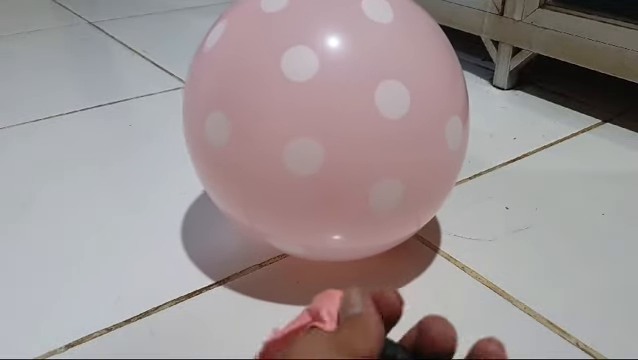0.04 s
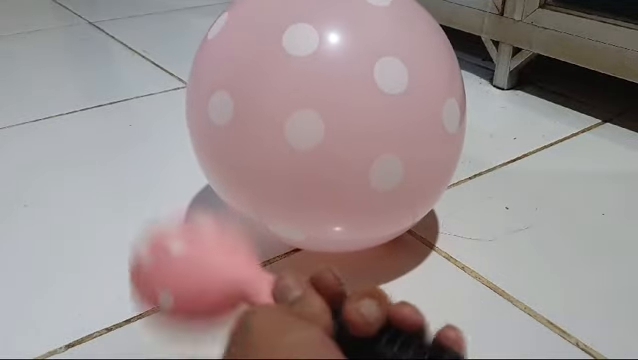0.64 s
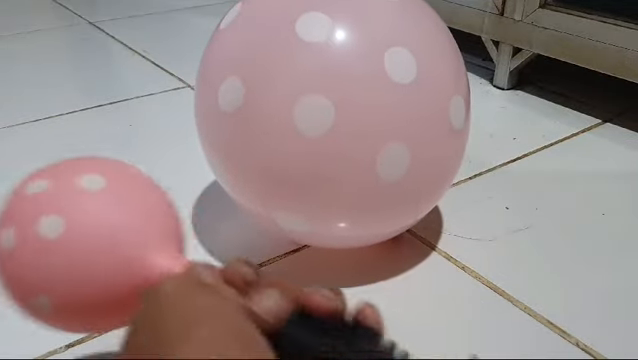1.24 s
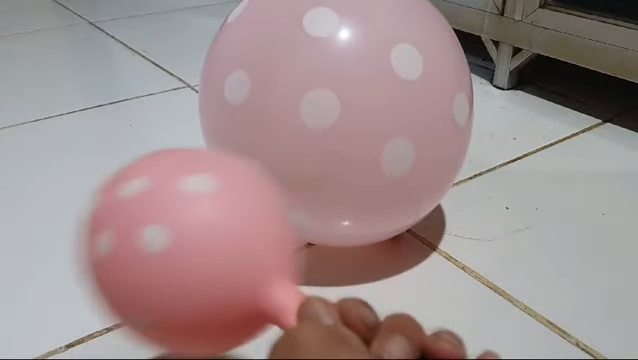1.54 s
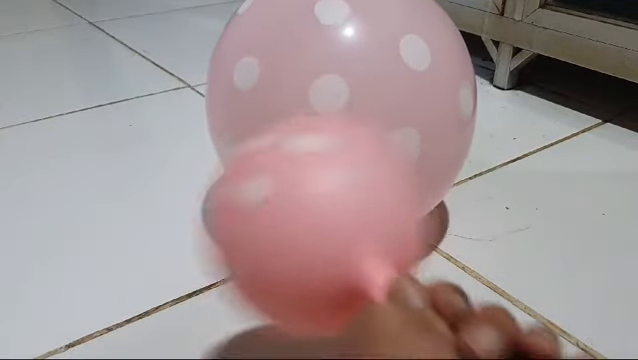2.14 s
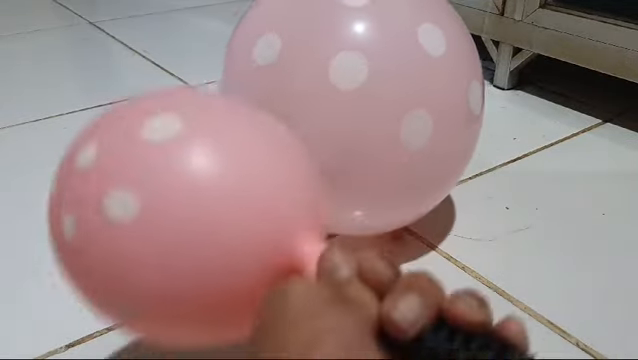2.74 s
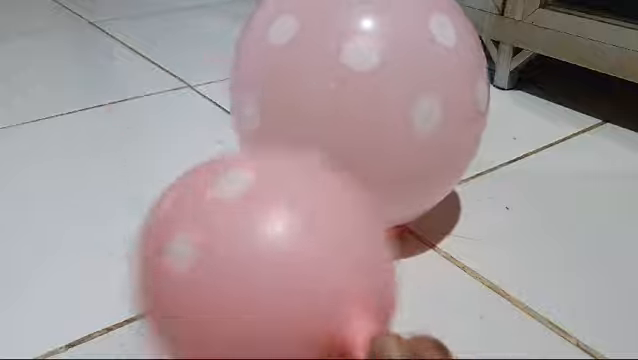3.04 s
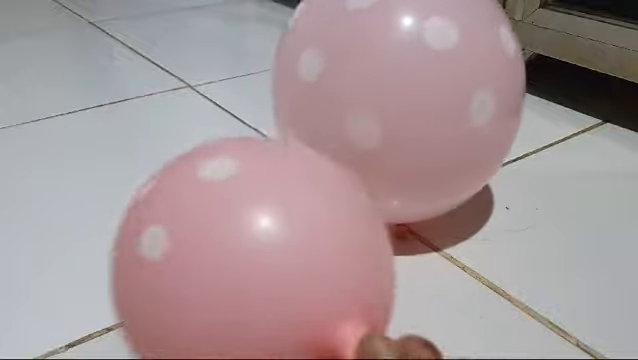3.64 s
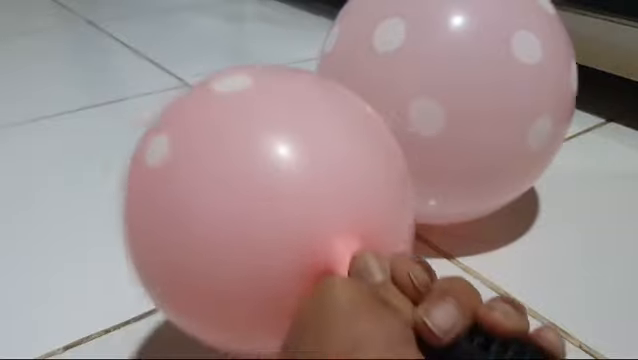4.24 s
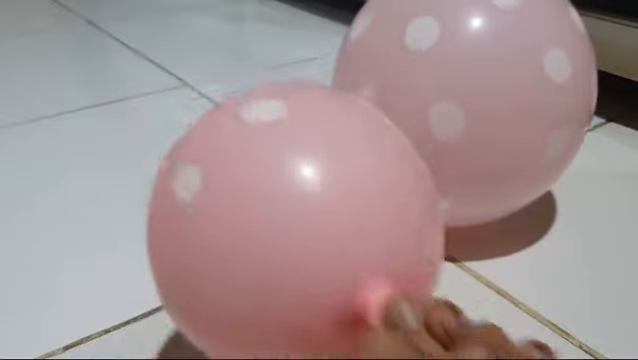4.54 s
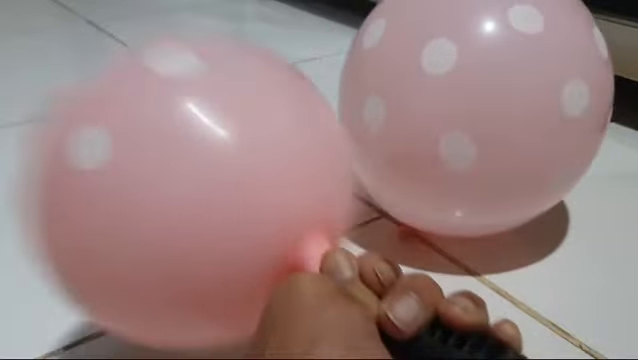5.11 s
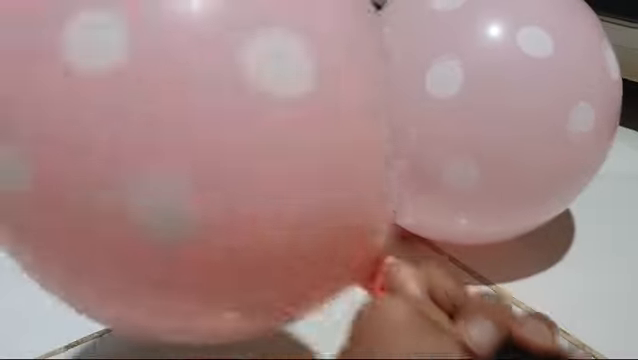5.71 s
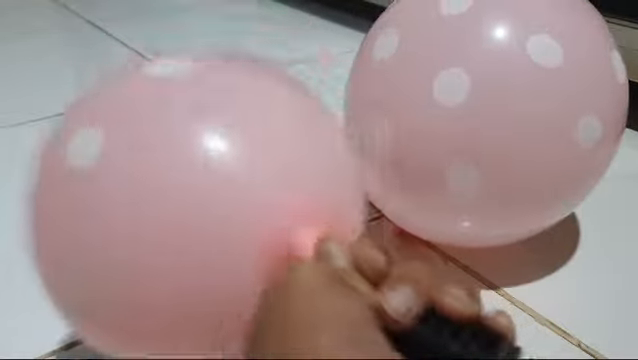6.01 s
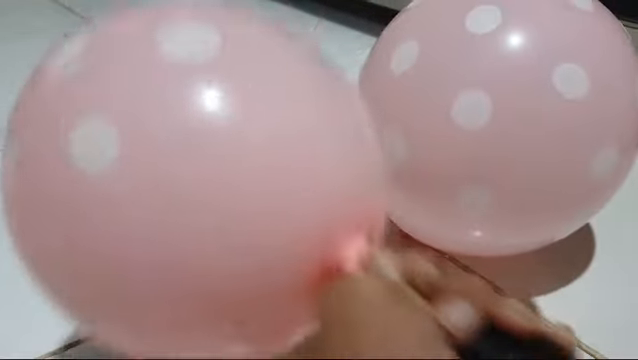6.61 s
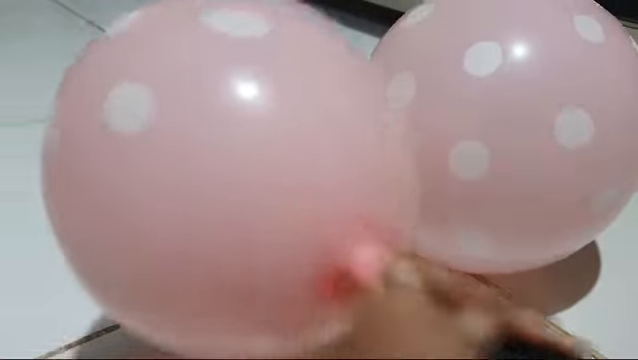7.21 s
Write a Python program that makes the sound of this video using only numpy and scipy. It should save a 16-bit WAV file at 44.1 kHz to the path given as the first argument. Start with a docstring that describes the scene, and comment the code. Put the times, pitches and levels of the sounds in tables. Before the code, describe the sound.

A two-way hand pump inflates a rubber balloon close to the microphone, slightly to the right, in a tiled room with a faint electrical hum. A tiny rubber chirp opens, followed by soft, slow puffs of air. From about 1 second the pumping turns brisk and regular, a little over two pushes a second, each a rasping hiss followed by a softer hiss on the pull. Soft thuds mark the start of each push, and sharp plastic knocks often mark its end, with dry ticks, small rattles and faint hand rubbing between. The strokes are strong from about 1.5 seconds, and between 2.5 and 4.5 seconds the hiss becomes higher and thinner as the balloon fills. The rubber neck flutters in three very short buzzes at about 6.1, 6.9 and 7.2 seconds, with a tiny squeak near 6.7. Pumping continues to the end, around 7.4 seconds.

```python
"""A tiled room with a mains hum, where a two-way hand pump fills a balloon close by.
Every push and pull drives a rush of air through the valves and the rubber neck, whose resonance climbs
as the balloon grows, while the modes of the air inside sink. The piston thuds and knocks at its stops,
flaps and rod tick, hands rub on the barrel and the rubber chirps against the nozzle.
Late on, the neck flutters into three short buzzes."""
import sys
import numpy as np
from scipy import signal
from scipy.fft import rfft, irfft
from scipy.io import wavfile
from scipy.ndimage import uniform_filter1d

SR = 44100
rng = np.random.default_rng(int(sys.argv[2]) if len(sys.argv) > 2 else 0)


def pcm_store(signal):
    """Save signal as 16-bit PCM."""
    levels = np.round(np.clip(np.atleast_2d(signal), -1, 1) * 32767)
    wavfile.write(sys.argv[1], SR, levels.astype(np.int16).T)


N = 320166

# Table levels are relative: each layer sets its own gain on top.
# The room's steady wash. Each row: frequency in Hz, noise density in dB.
WASH_SPECTRUM = [(20, -27), (45, -3), (80, -20), (160, 7), (300, 10), (700, 4.5), (1400, 2.5), (3000, -24),
                 (8000, -20), (16000, -58)]
# Mains hum. Each row: frequency in Hz, level in dB.
HUM_PARTIALS = [(100.05, -45.8), (200.1, -69)]
# Stereo width of diffuse sound. Each row: frequency in Hz, left-right coherence from 0 to 1.
COHERENCE = [(30, 0.97), (130, 1), (300, 0.85), (640, 0.92), (1400, 0), (4000, 0.2), (16000, 0.0)]
# The room's tail. Each row: frequency in Hz, seconds to fall 60 dB.
ROOM_DECAY = [(100, 0.074), (500, 0.33), (2000, 0.34), (8000, 0.25), (16000, 0.086)]
# Hands moving on the barrel. Each row: frequency in Hz, noise density in dB.
HAND_SPECTRUM = [(15, -1), (32, -36), (70, 7.5), (140, -5.5), (300, -16.5), (700, -35), (2000, -30.5)]

# Rubber on the nozzle. Each row: start in seconds, level in dB, pitch in Hz, length in seconds.
CHIRPS = [(0.023, -47.5, 3420, 0.034), (0.068, -52, 6460, 0.069), (6.7192, -20, 3470, 0.0042),
          (6.7226, -22, 3430, 0.00086)]
# Valve flaps and the loose rod. Each row: time in seconds, level in dB, base pitch in Hz.
TICKS = [(0.3188, -35.5, 690), (1.0812, -33, 1040), (1.3208, -35.5, 760), (1.5772, -32.5, 1000),
         (2.0405, -24.5, 1060), (2.231, -24.5, 910), (2.4928, -32, 920), (2.7112, -32, 850),
         (3.0333, -25, 880), (3.605, -24.5, 1000), (3.8124, -29.5, 850), (4.1179, -31, 710),
         (4.3151, -28, 810), (4.5629, -36.5, 850), (4.7388, -26, 790), (4.9866, -31, 910),
         (5.5646, -28, 756), (5.8193, -32, 1210), (5.9871, -33, 710), (6.3676, -31.5, 740),
         (6.639, -30, 770), (6.7133, -33, 710)]
# The body of a tick. Each row: multiple of the base pitch, level in dB, seconds to fall 60 dB.
TICK_MODES = [(0.5, -37, 0.018), (1.02, 23.5, 0.01), (1.55, 23.5, 0.0098), (3.4, -30, 0.0035)]
# A flap slammed by the air. Each row: frequency in Hz, level in dB, seconds to fall 60 dB.
SNAP_MODES = [(2520, 6, 0.017), (2790, 0, 0.023), (4800, 1, 0.0058)]
# The piston hits the barrel's end. Each row: time in seconds, then thump, clack and crack levels in dB.
KNOCKS = [(1.1336, -50.5, -37, -23), (1.5494, -41.5, -21, -12), (2.0125, -40, -22.5, -9.5),
          (2.4434, -40, -18.5, -6.5), (4.0897, -41, -23, -10), (4.5332, -38.5, -21, -8),
          (4.963, -40.5, -24, -12), (5.4332, -50, -22.5, -29), (5.7917, -39, -26, -4),
          (6.2045, -40.5, -23.5, -11.5), (6.594, -40.5, -18.5, -3), (7.0184, -47.5, -32.5, -29)]
# The balloon's thump. Each row: frequency in Hz, level in dB, seconds to fall 60 dB.
THUMP_MODES = [(31.4, -40, 0.56), (65, -27.5, 0.55), (122.7, -6.5, 0.065), (255, -15, 0.068)]
# The barrel's clack. Each row: base frequency in Hz, level in dB, seconds to fall 60 dB.
CLACK_MODES = [(378, -4, 0.013), (503, 11.5, 0.029), (1070, 7.5, 0.0086), (1650, 9.5, 0.014)]
# The crack of hard plastic. Each row: frequency in Hz, noise density in dB.
CRACK_SPECTRUM = [(500, -17), (1500, 5), (4000, -9.5), (7000, -11.5), (11000, -9), (16000, -18)]
# The piston turns round to push. Each row: time in seconds, pop level in dB.
THUDS = [(0.9235, -28), (1.3765, -23.5), (1.855, -27), (2.299, -24.5), (2.8053, -39), (3.3548, -21),
         (3.892, -35.5), (4.3765, -21.5), (4.802, -21.5), (5.2249, -22.5), (5.6438, -21), (6.057, -21.5),
         (6.4524, -21), (6.8434, -23), (7.181, -21.5)]
# Pump and balloon swaying. Each row: frequency in Hz, level in dB, seconds to fall 60 dB.
SWAY_MODES = [(74.8, 8, 0.13), (135, -3.5, 0.14), (207, -8.5, 0.058), (260, -11, 0.05)]
# The neck flutters. Each row: start in seconds, length in seconds, level in dB, opening pitch in Hz.
BUZZES = [(6.112, 0.066, -35, 387.5), (6.897, 0.045, -39, 316), (7.233, 0.07, -32.5, 420)]
# The tone curve over the buzz's harmonics. Each row: frequency in Hz, level in dB.
BUZZ_SPECTRUM = [(300, 3), (420, 5), (770, 4), (1150, -5), (1600, 1), (2100, -17), (2800, 1), (5000, -21)]

# Push strokes. Each row: start in seconds, length in seconds, level in dB, neck resonance boost in dB.
PUSHES = [(0.409, 0.36, -32.5, 9), (0.936, 0.2, -29.5, 15.5), (1.384, 0.21, -23.0, 18),
          (1.863, 0.19, -23.5, 13.5), (2.307, 0.19, -22.0, 9.5), (2.818, 0.222, -24.5, 3.5),
          (3.348, 0.31, -27, 1), (3.885, 0.29, -26.5, 5), (4.371, 0.23, -23.0, 5), (4.798, 0.22, -23, 0),
          (5.224, 0.22, -20.5, -2), (5.639, 0.22, -20.0, -3), (6.054, 0.21, -23.0, 5),
          (6.431, 0.24, -30, -0.5), (6.84, 0.17, -26, 5.5), (7.171, 0.24, -24, 5)]
# Pull strokes. Each row: start in seconds, length in seconds, level in dB.
PULLS = [(0.12, 0.33, -42.5), (0.64, 0.3, -40.5), (1.144, 0.23, -33), (1.619, 0.23, -32.5),
         (2.072, 0.21, -29.5), (2.501, 0.31, -28.5), (3.038, 0.31, -29.5), (3.604, 0.3, -30),
         (4.125, 0.28, -30.0), (4.565, 0.25, -28.0), (4.989, 0.25, -29), (5.416, 0.229, -30),
         (5.833, 0.22, -30.5), (6.237, 0.22, -30.5), (6.642, 0.2, -32), (6.979, 0.21, -33.0)]
# The push valve's hiss. Each row: frequency in Hz, noise density in dB, left minus right in dB.
PUSH_VALVE = [(305, -22.5, 5), (775, -6, -3), (870, -9.5, 0.5), (1630, -4, 1), (2440, -5.5, 2.5),
              (2820, -1, -4.5), (3920, -2, -6.5), (5800, 0, -1), (8580, -3, -4.5), (9070, -9.5, 10.5),
              (11550, -6.5, -11.5), (14900, -10.5, -2.5), (16000, -19, -1)]
# The pull valve's hiss. Each row: frequency in Hz, noise density in dB, left minus right in dB.
PULL_VALVE = [(300, -33, -11), (690, -6.5, -1), (890, -15.5, 5), (1580, -5, 0), (2150, -3.5, 1.5),
              (2970, 2, -2.5), (3800, -1.5, -8), (5840, -4, -1.5), (8300, -6.5, -2), (9500, -11.5, -2),
              (12200, -9, -11), (14500, -13, -5.5), (16000, -19, -1.1)]
# The hiss thins as the rubber stretches.
# Each row: time in seconds, neck resonance in Hz, low shelf (body) in dB, high shelf (fizz) in dB.
STRETCH = [(0.58, 3700, 5.5, 0.5), (0.8, 2680, 1.5, 5.5), (1.04, 3900, 6, 1), (1.5, 4000, 0, 4),
           (1.95, 4060, -7.5, -2), (2.5, 4280, -3, -1), (3.7, 6060, -6, -3), (4.5, 6450, -7.5, 1),
           (5.4, 5640, -2.5, 0.5), (6.5, 5860, -4, 2.5), (7.2, 5800, -4, 3)]
# The air inside the balloon at size 1. Each row: centre in Hz, width in Hz, boost or cut in dB.
BALLOON_MODES = [(1400, 470, 6.5), (2570, 170, 8.5), (4060, 280, 4.5), (4380, 220, -5.5), (5600, 46, 11),
                 (6800, 120, 8), (7780, 260, -1), (8530, 220, 1.5), (10030, 240, -1), (12000, 530, 2)]
# Resonances of barrel and nozzle. Each row: centre in Hz, width in Hz, boost in dB.
BARREL_MODES = [(1350, 220, 6), (3000, 180, 2.5), (3850, 160, 2.5), (4200, 220, 3), (6450, 200, 1.5),
                (8250, 350, 2)]

EDGE_HZ = 15900  # top of the audible band of the scene
FRAME, HOP = 512, 128  # samples; the hiss is shaped frame by frame
TIME = np.arange(N) / SR
BINS = np.fft.rfftfreq(FRAME, 1 / SR)
FRAME_TIME = np.arange(N // HOP + 5) * HOP / SR
RING_TIME = np.arange(SR // 4) / SR

# A stroke is one arch of air flow: the share of its length at which it crests, and how pointed it is.
PUSH_CREST, PULL_CREST, ARCH_POWER = 0.38, 0.43, 2.48
BLEED_DB, BLEED_S = -8, 0.026  # pressure left in the barrel bleeds away after each stroke
SLACK_DB, LEAK_DB, LEAK_BUILD_S = -56.5, -49.5, 0.26  # the nozzle leaks more once the neck has filled
SPURT_DB, SPURT_S, SPURT_LEAD_S = -42, 0.0054, 0.005  # a spurt slips past the seal as it flips over
# A pull sounds through the other valve: a steadier, slightly higher neck resonance and more body.
PULL_NECK_DB, PULL_NECK_RATIO, PULL_BODY_DB = 8, 1.037, 4.0
# The rod ticks faintly once in each pull, within this share of the stroke around its middle.
FAINT_SHARE, FAINT_DB, FAINT_SPREAD_DB, FAINT_HZ = 0.6, -37, 5, 750


def amp(db):
    """Decibels to gain."""
    return 10 ** (np.asarray(db) / 20)


def unit(x):
    """Scales to rms 1."""
    return x / np.sqrt(np.mean(x ** 2) + 1e-20)


def curve(table, hz, column=1):
    """One column of a table, interpolated on a log-frequency axis."""
    columns = np.transpose(table)
    return np.interp(np.log(hz + 1), np.log(columns[0] + 1), columns[column])


def add(mix, s, sound):
    """Drops a stereo sound into the mix at s seconds."""
    part = mix[:, max(round(s * SR), 0):][:, :sound.shape[1]]
    part += sound[:, :part.shape[1]]


def wander(rate_hz, size=N):
    """A smooth random wobble of about rms 1, rolled off above rate_hz."""
    hz = np.fft.rfftfreq(N, 1 / SR)
    return unit(irfft(rfft(rng.standard_normal(N)) / (1 + (hz / rate_hz) ** 4), N))[:size]


def diffuse(a, b, hz):
    """Blends two independent spectra into a stereo pair, narrow in the bass and wide on top."""
    same = np.clip(curve(COHERENCE, hz), -1, 1)
    return np.array([a, same * a + np.sqrt(1 - same ** 2) * b])


def noise(spectrum):
    """A steady bed of diffuse, coloured stereo noise at rms 1."""
    hz = np.fft.rfftfreq(N, 1 / SR)
    white = diffuse(*rfft(rng.standard_normal((2, N))), hz)
    return unit(irfft(white * amp(curve(spectrum, hz)), N))


def ring(modes, contact_s, pitch=1):
    """Damped modes, struck once, at peak 1; a longer contact gives a duller hit."""
    wave = sum(amp(db - 60 * RING_TIME / t60) * np.sin(2 * np.pi * hz * pitch * RING_TIME)
               for hz, db, t60 in modes)
    force = RING_TIME * np.exp(-RING_TIME / contact_s)
    wave = signal.fftconvolve(wave, force)[:len(wave)]
    return wave / abs(wave).max()


def peaks(modes, hz):
    """Resonances as bell curves, in dB at the frequencies hz."""
    return sum(db / (1 + (2 * (hz - centre) / width) ** 2) for centre, width, db in modes)


def pan_right(sound, lag_s=0.00026, shade_db=8.0, shade_hz=450):
    """Places a sound on the pump's side: the left hears it later and, above the bass, weaker."""
    hz = np.fft.rfftfreq(len(sound), 1 / SR)
    side = amp(shade_db / 2 * hz / (hz + shade_hz))
    delay = np.exp(-2j * np.pi * hz * lag_s)
    return irfft(rfft(sound) * np.array([delay / side, side]), len(sound))


def room_tone(wash_db=-56):
    """Mains hum over a soft, steady wash."""
    hum = sum(np.sqrt(2) * amp(db) * np.sin(2 * np.pi * (hz * TIME + rng.random()))
              for hz, db in HUM_PARTIALS)
    return amp(wash_db) * noise(WASH_SPECTRUM) + pan_right(hum, lag_s=0.0001)


def reverb(send, build_s=0.0017):
    """The tiled room's diffuse tail, each band dying at its own speed."""
    hz, t, white = signal.stft(rng.standard_normal((2, SR // 2)), SR, nperseg=256)
    decay = amp(-60 * t / curve(ROOM_DECAY, hz)[:, None])
    tail = signal.istft(white * decay * (1 - np.exp(-t / build_s)), SR, nperseg=256)[1]
    return signal.fftconvolve(send, tail / np.linalg.norm(tail[0]), axes=1)[:, :N]


def hand_rub(level_db=-52, lump_db=1.0, rest_db=-7, jolt_db=6.0, jolt_s=0.038):
    """Low, lumpy rubbing of hands: it sets in with the hard pumping and swells after each piston stop."""
    first_thud = THUDS[0][0]
    effort_db = np.interp(TIME, [first_thud / 2, first_thud], [rest_db, 0])
    jolts = sum((FRAME_TIME > s) * np.exp(-abs(FRAME_TIME - s) / jolt_s) for s, *_ in THUDS + KNOCKS)
    effort_db += jolt_db * np.interp(TIME, FRAME_TIME, jolts)
    sides = amp([wander(4.2), wander(2.7)])  # left and right each drift by about 1 dB
    return noise(HAND_SPECTRUM) * sides * amp(level_db + effort_db + lump_db * wander(14))


def rubber_chirps(waver=0.098):
    """Brief, wavering whistles as the rubber sticks and slips on the nozzle."""
    out = np.zeros((2, N))
    for s, db, hz, length in CHIRPS:
        count = round(length * SR)
        cycles = np.cumsum(hz * (1 + waver * wander(600, count))) / SR
        whistle = np.sin(2 * np.pi * cycles) * np.hanning(count)
        add(out, s, pan_right(amp(db) * whistle, shade_db=15.5))
    return out


def piston_rattles(level_db=-37, spread_s=0.018, pitch_hz=300, count=3):
    """The loose piston shifts in the barrel before each thud and settles after each knock."""
    out = np.zeros((2, N))
    for s, direction in [(row[0], -1) for row in THUDS] + [(row[0], 1) for row in KNOCKS]:
        for when, tone, softness in rng.random((count, 3)):
            bump = ring(TICK_MODES, contact_s=0.00016, pitch=pitch_hz * (.5 + tone))
            offset_s = direction * spread_s * (0.195 + when)
            add(out, s + offset_s, amp(level_db - 6.2 * softness) * pan_right(bump))
    return out


def flap_and_rod_ticks(gain_db=7.0, lead_s=0.00082, snap_db=0.5, full_flow_db=-35):
    """Dry ticks of flaps and rod, with a bright snap on top while air is flowing."""
    out = np.zeros((2, N))
    snap = ring(SNAP_MODES, contact_s=0.00002)
    hits = list(TICKS)
    for start, length, _ in PULLS:
        when, size, tone = rng.random(3) - .5
        s = start + length * (.5 + FAINT_SHARE * when)
        hits.append((s, FAINT_DB + FAINT_SPREAD_DB * size, FAINT_HZ * 2 ** (tone / 2)))
    for (s, db, hz), stream_db in zip(hits, flow_db([hit[0] for hit in hits])):
        slam_db = min(stream_db - full_flow_db, 0)
        tick = ring(TICK_MODES, contact_s=0.00003, pitch=hz) + amp(snap_db + slam_db) * snap
        add(out, s - lead_s, amp(db + gain_db) * pan_right(tick))
    return out


def piston_knocks(thump_gain_db=15.0, crack_gain_db=-8.5, crack_t60=0.011, rise_s=0.00005, lead_s=0.0007):
    """Plastic meets plastic: a short crack, a clack of the barrel and a thump of the balloon."""
    out = np.zeros((2, N))
    thump = -ring(THUMP_MODES, contact_s=0.00085)
    colour = amp(curve(CRACK_SPECTRUM, np.fft.rfftfreq(len(RING_TIME), 1 / SR)))
    envelope = amp(-60 * RING_TIME / crack_t60) * (1 - np.exp(-RING_TIME / rise_s))
    for s, thump_db, clack_db, crack_db in KNOCKS:
        clack = ring(CLACK_MODES, contact_s=0.00004, pitch=rng.uniform(1.0, 1.05))  # no two land alike
        white = rng.standard_normal(len(RING_TIME))
        crack = unit(irfft(rfft(white) * colour, len(white))) * envelope
        hit = amp(thump_db + thump_gain_db) * thump + amp(clack_db) * clack
        hit += amp(crack_db + crack_gain_db) * crack
        add(out, s - lead_s, pan_right(hit, shade_db=13.5, shade_hz=1500))
    return out


def seal_thuds(pop_gain_db=-2.5, sway_db=-25.5, fade_db_per_s=0.7, sharpest_s=0.00048, softening=0.57):
    """The soft piston seal flips over: a dip and a spike of pressure, and pump and balloon sway."""
    out = np.zeros((2, N))
    sway = pan_right(ring(SWAY_MODES, contact_s=0.00023))
    hardest_db = max(db for _, db in THUDS)
    for s, db in THUDS:
        width_s = sharpest_s * amp(softening * (hardest_db - db))  # a gentle turn gives a rounder pop
        from_spike = RING_TIME / width_s - 10
        pop = np.exp(-from_spike ** 2 / 2) - np.exp(-(from_spike + 2) ** 2 / 2)
        add(out, s - 10 * width_s, amp(db + pop_gain_db) * pan_right(pop))
        add(out, s - 0.00073, amp(sway_db - fade_db_per_s * s) * sway)  # a fuller balloon sways less
    return out


def neck_buzzes(attack_s=0.01, release_s=0.031, sag_hz_per_s=200, jitter=0.011, shimmer_db=4.5):
    """The neck flaps in the air stream like a loose reed, sagging in pitch."""
    out = np.zeros((2, N))
    for start, length, db, top_hz in BUZZES:
        t = np.arange(0, length, 1 / SR)
        hz = top_hz - sag_hz_per_s * t
        envelope = np.minimum(t / attack_s, 1) * np.minimum((length - t) / release_s, 1)
        cycles = np.cumsum(hz * (1 + jitter * wander(250, len(t)))) / SR
        reed = sum(amp(curve(BUZZ_SPECTRUM, k * hz)) * np.cos(2 * np.pi * (k * cycles + rng.random()))
                   for k in range(1, 12))
        gain = envelope * amp(db + shimmer_db * wander(140, len(t)))
        add(out, start, pan_right(unit(reed) * gain, lag_s=0.0001))
    return out


def flow_db(times):
    """The air stream's level at the given times: stroke arches, their bleed, spurts and the leak."""
    t, strokes = FRAME_TIME, 0
    for rows, crest in ((PUSHES, PUSH_CREST), (PULLS, PULL_CREST)):
        for start, length, db, *_ in rows:
            ramp = np.interp(t, [start, start + crest * length, start + length], [0, 1, 0])
            strokes += (amp(db) * np.sin(np.pi / 2 * ramp) ** ARCH_POWER) ** 2
    hold = np.exp(-HOP / SR / BLEED_S)
    bleed = amp(BLEED_DB) ** 2 * signal.lfilter([1 - hold], [1, -hold], strokes)
    spurts = amp(SPURT_DB) ** 2 * sum(np.exp(-((t - s + SPURT_LEAD_S) / SPURT_S) ** 2) for s, _ in THUDS)
    leak = amp(np.interp(t - PUSHES[0][0], [0, LEAK_BUILD_S], [SLACK_DB, LEAK_DB])) ** 2
    return np.interp(times, t, 10 * np.log10(strokes + bleed + spurts + leak))


def resonances_db(swell_start_s=0.572, swell_power=0.21, limp_size=0.514, flattening=4.3):
    """The balloon's modes sink as it swells and stand out less in a large one; the barrel's stay put."""
    filling_s = np.maximum(FRAME_TIME - swell_start_s, 0)
    size = np.maximum(filling_s ** swell_power, limp_size)[:, None]
    balloon = peaks(BALLOON_MODES, BINS * size) / np.maximum(size, 1) ** flattening
    return balloon + peaks(BARREL_MODES, BINS)


def stroke_colour(middle_s, valve, neck_db, neck_ratio=1, extra_body_db=0, body_hz=2200, fizz_hz=8000):
    """One stroke's stereo tone curves in dB: the valve's hiss and the neck's resonance."""
    times, *columns = np.transpose(STRETCH)
    neck_hz, body_db, fizz_db = (np.interp(middle_s, times, column) for column in columns)
    hz = BINS + 1
    body = (body_db + extra_body_db) / (1 + (hz / body_hz) ** 4)
    fizz = fizz_db / (1 + (fizz_hz / hz) ** 6)
    hiss = curve(valve, hz) + body + fizz
    balance = curve(valve, hz, column=2) / 2
    neck = neck_db * np.exp(-.5 * (np.log(hz / (neck_hz * neck_ratio)) / 0.17) ** 2)
    neck_left = 0.78 * neck  # the balloon screens the left side
    return np.array([[hiss + balance, hiss - balance], [neck_left, neck]])


def air_colour_db(shut_db=-50, open_db=-33):
    """The tone glides from stroke to stroke; the resonances sing when the stream holds the neck open."""
    strokes = [(start + length / 2, PUSH_VALVE, neck_db) for start, length, _, neck_db in PUSHES]
    strokes += [(start + length / 2, PULL_VALVE, PULL_NECK_DB, PULL_NECK_RATIO, PULL_BODY_DB)
                for start, length, _ in PULLS]
    middles = np.array([stroke[0] for stroke in strokes])
    nearest = abs(FRAME_TIME[:, None] - middles).argmin(axis=1)
    colours = np.array([stroke_colour(*stroke) for stroke in strokes])[nearest]
    valve_db, neck_db = uniform_filter1d(colours, size=12, axis=0).transpose(1, 2, 0, 3)
    opening = np.interp(flow_db(FRAME_TIME), [shut_db, open_db], [0, 0.83])
    return valve_db + opening[:, None] * (neck_db + resonances_db())


def air_rush(ripple_db=4.0, eddy_db=1.5, rasp_db=0.26, rasp_hz=450, low_cut_hz=200, drift_db=1.35):
    """Turbulent hiss through valves and neck, rasping as the rubber trembles."""
    draws = rng.standard_normal((7, len(FRAME_TIME), len(BINS)))
    white = diffuse(draws[0] + 1j * draws[1], draws[2] + 1j * draws[3], BINS)
    eddies = unit(uniform_filter1d(uniform_filter1d(draws[4], size=4, axis=0), size=12, axis=1))
    # Reflections from the moving balloon and the tiles carve slowly shifting peaks and notches.
    ripple = unit(uniform_filter1d(uniform_filter1d(draws[5:], size=45, axis=1), size=2, axis=2))
    low_cut = BINS ** 2 / (BINS ** 2 + low_cut_hz ** 2)
    gain = amp(air_colour_db() + ripple_db * ripple + eddy_db * eddies) * low_cut
    # Every frame gets the same treble power, so the flow alone rides its level.
    treble = (BINS > 2000) & (BINS < EDGE_HZ)
    gain /= np.sqrt((gain[:, :, treble] ** 2).sum(axis=2).mean(axis=0))[:, None]
    hiss = signal.istft((white * gain).transpose(0, 2, 1), nperseg=FRAME, noverlap=FRAME - HOP)[1][:, :N]
    rasp = amp(rasp_db * wander(rasp_hz))
    lean_db = drift_db * np.array([[1], [-1]]) * (TIME / TIME[-1] - .5)  # the balloon grows leftwards
    return unit(hiss * rasp) * amp(flow_db(TIME) + lean_db)


def scene(hit_send_db=-11, air_send_db=-18):
    """The pump up front, with a touch of reverb, over rubbing hands and room tone."""
    hits = seal_thuds() + piston_knocks() + piston_rattles() + flap_and_rod_ticks() + rubber_chirps()
    stream = air_rush() + neck_buzzes()
    tail = reverb(amp(hit_send_db) * hits + amp(air_send_db) * stream)
    return hits + stream + tail + hand_rub() + room_tone()


def record(dry):
    """A steep high cut at EDGE_HZ over the whole mix."""
    high_cut = signal.firwin(511, EDGE_HZ, window=("kaiser", 9), fs=SR)
    return signal.oaconvolve(dry, high_cut[None], "same")


dry = scene()
out = record(dry)
pcm_store(out)
```